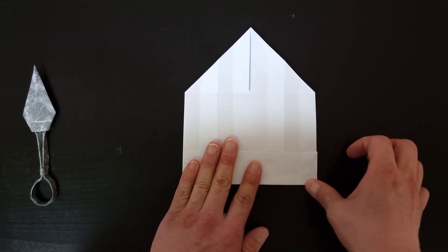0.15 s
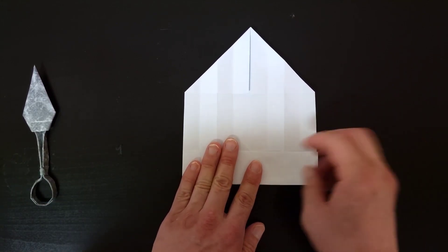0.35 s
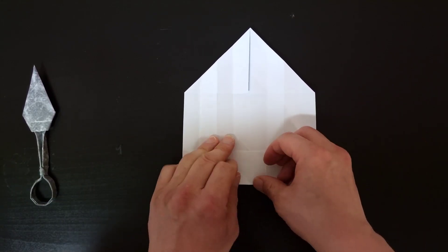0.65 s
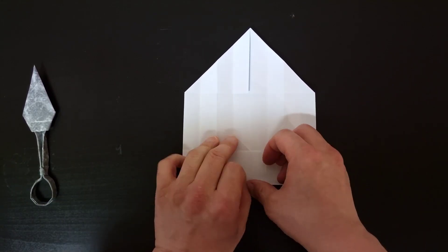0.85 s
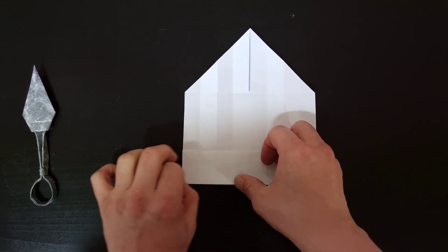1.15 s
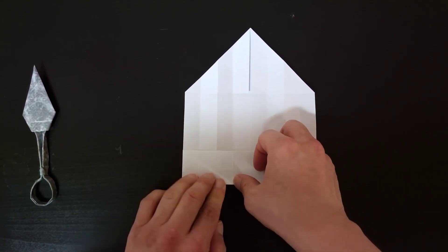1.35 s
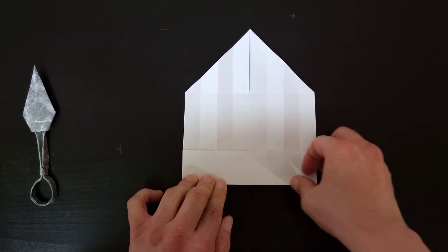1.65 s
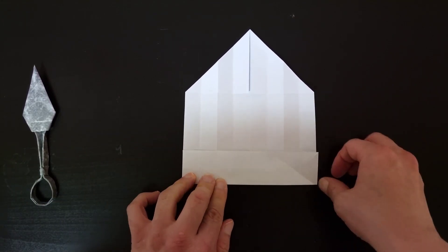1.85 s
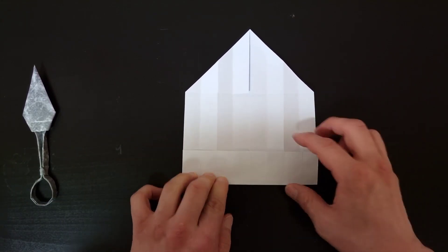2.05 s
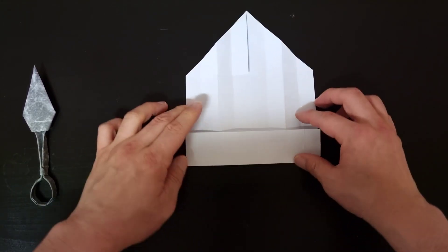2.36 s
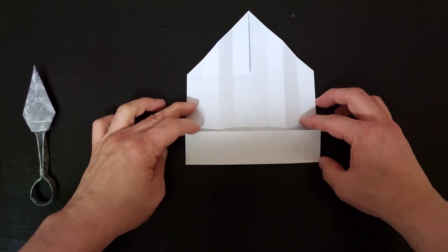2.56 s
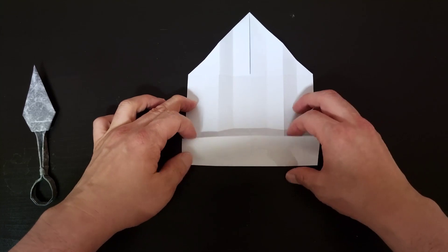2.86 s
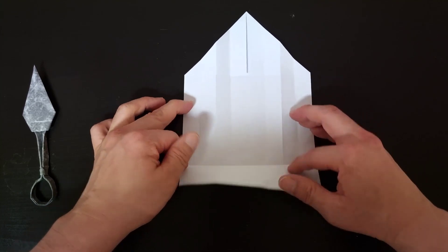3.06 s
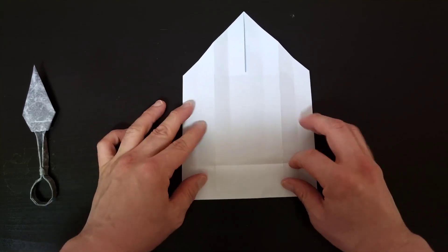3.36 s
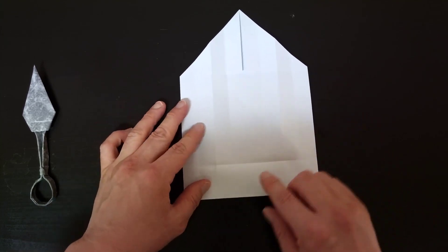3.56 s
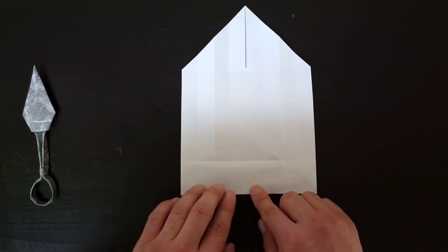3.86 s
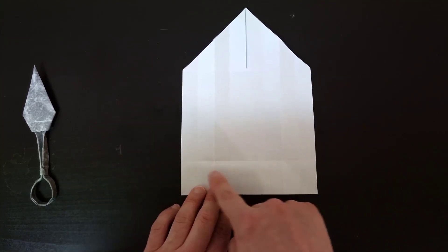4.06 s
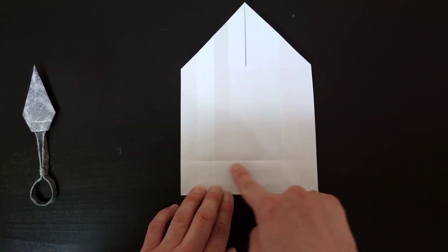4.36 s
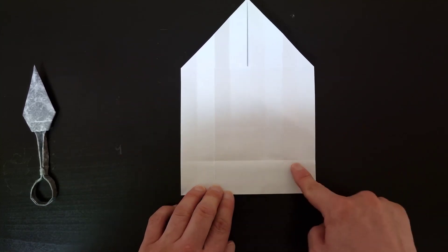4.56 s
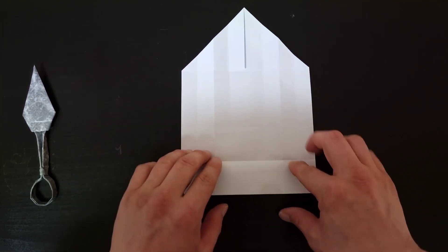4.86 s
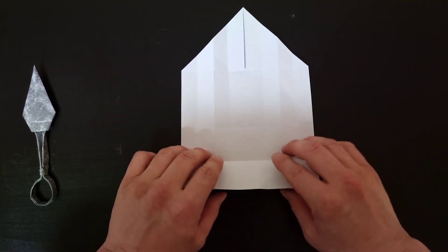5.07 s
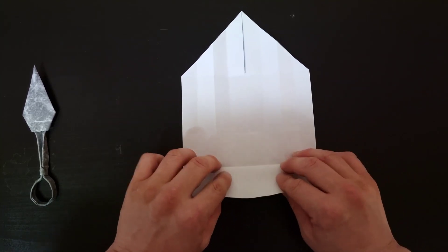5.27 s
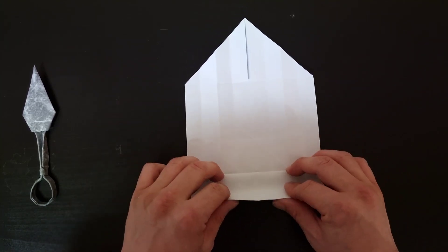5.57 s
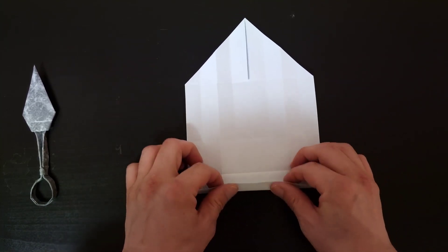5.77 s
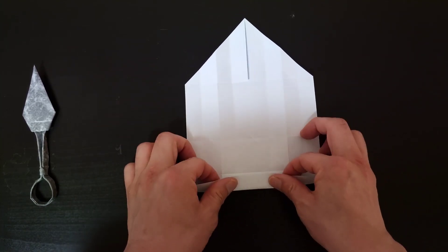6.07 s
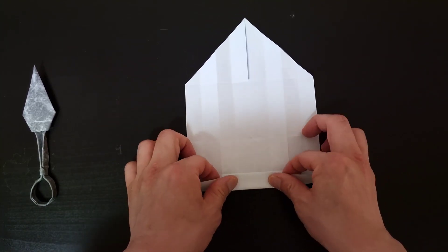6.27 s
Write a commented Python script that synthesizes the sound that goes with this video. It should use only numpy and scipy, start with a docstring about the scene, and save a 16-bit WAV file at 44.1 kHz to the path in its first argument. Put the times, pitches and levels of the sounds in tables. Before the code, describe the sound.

Close by, hands stroke, slide and fold a sheet of paper on a wooden table, with hissing rubs, rustles, crackles and soft finger knocks.

```python
"""Folding paper on a table

A sheet of printer paper is folded by hand on a wooden table, heard from close by in a small quiet room.
Skin and sheet hiss and rustle as streams of stick-slip grains, coarser for the sheet than for the skin.
Dragging judders the table. Buckling paper crackles and pops as short bursts of slips and noise.
Fingers landing excite decaying table modes, a pressing hand gives a deep thump, and a faint room tone lies below."""
import sys
import numpy as np
from scipy import signal
from scipy.fft import rfft, irfft, next_fast_len
from scipy.io import wavfile

SR = 44100
rng = np.random.default_rng(int(sys.argv[2]) if len(sys.argv) > 2 else 0)


def wav_out(sig):
    """Save sig, one row per channel (or a flat mono array), as 16-bit PCM at SR to the path in sys.argv[1]."""
    wavfile.write(sys.argv[1], SR, np.round(np.clip(np.atleast_2d(sig).T, -1, 1) * 32767).astype(np.int16))


N = 282681
TIME = np.arange(N) / SR
SIZE = next_fast_len(N + SR // 2)
FREQS = np.maximum(np.arange(SIZE // 2 + 1) * SR / SIZE, 1)
CUTOFF_HZ = 15900
# loudness grows as speed to these powers
HISS_POWER, RUSTLE_POWER, RUB_POWER = 3.34, 2.42, 2.14

# Finger drawn over the paper. Each row: top speed at [s], speeding up [s], slowing down [s],
# skin hiss [relative dB], sheen over the hiss [dB], rub on the table [relative dB].
FINGER_STROKES = [(0.131, 0.18, 0.32, -65.5, 2, -59), (0.609, 0.14, 0.24, -67, -3, -60),
                  (0.861, 0.021, 0.14, -71, 4, -71.5), (1.16, 0.32, 0.21, -66.5, 4, -58),
                  (1.42, 0.012, 0.016, -55.5, 7.5, -53), (1.632, 0.28, 0.27, -65.5, 3.5, -58),
                  (1.82, 0.23, 0.34, -74.5, -3, -57.5), (1.983, 0.05, 0.034, -76, -31, -50),
                  (4.43, 0.13, 0.14, -67.5, 2.5, -67), (4.571, 0.2, 0.16, -68, 12, -72),
                  (4.862, 0.12, 0.082, -67, -3, -96), (5.105, 0.085, 0.07, -106, -6, -57.5),
                  (5.206, 0.14, 0.054, -110, -11, -54.5), (6.0, 0.44, 0.22, -83, -12, -63.5)]
# Sheet slides, lifts or rolls over. Each row: top speed at [s], speeding up [s], slowing down [s],
# rustle [relative dB], nominal pitch of the bent flap at top speed [Hz], rub on the table [relative dB].
SHEET_MOVES = [(0.001, 0.03, 0.077, -58, 4150, -77), (1.25, 0.054, 0.028, -66, 4300, -49.5),
               (2.229, 0.034, 0.2, -62.5, 3170, -55), (2.359, 0.062, 0.16, -50, 3684, -51),
               (2.659, 0.11, 0.15, -75.5, 3630, -58.5), (2.913, 0.041, 0.1, -57.5, 3530, -48.5),
               (3.062, 0.13, 0.078, -52.5, 3210, -54.5), (3.129, 0.048, 0.35, -72, 4220, -60),
               (3.339, 0.11, 0.13, -60, 4620, -68), (3.55, 0.076, 0.11, -61, 4180, -62.5),
               (3.776, 0.081, 0.037, -62.5, 4350, -70), (4.892, 0.16, 0.21, -76, 3220, -74),
               (5.37, 0.19, 0.27, -65.5, 3936, -58.5), (5.541, 0.22, 0.13, -58.5, 4250, -51.5),
               (5.691, 0.098, 0.12, -59, 4380, -64), (5.799, 0.076, 0.11, -60.5, 2767, -61.5),
               (5.939, 0.046, 0.065, -59.5, 2840, -55.5)]
# Spectra of moving sheet and of skin on paper. Each row: frequency [Hz], relative density [dB per Hz].
RUSTLE_SPECTRUM = [(600, -21), (1900, -9), (3200, -2.5), (4000, 7), (4800, -2.5), (5800, -2.5), (7500, -8),
                   (11000, -16)]
HISS_SPECTRUM = [(2500, -4.5), (5500, 5.5), (7000, 9), (10000, 1.5), (13000, -4), (16000, -1.5)]


def sliding(hiss_gain_db=3.0, catch_db=2.5, sheet_sheen_db=-7, sheen_hz=11000,
            stroke_rustle_db=-15, sheet_hiss_db=-8.5):
    """The moving sheet rustles in coarse grains; skin on its fibres gives a much finer hiss."""
    sheet = movements([(*timing, db) for *timing, db, _, _ in SHEET_MOVES], RUSTLE_POWER)
    skin = movements([(*timing, db) for *timing, db, _, _ in FINGER_STROKES], HISS_POWER)
    racing = movements([(*timing, db + sheen_db) for *timing, db, sheen_db, _ in FINGER_STROKES], HISS_POWER)

    rustle = widen(*[colour(slips(N, per_s=4200, spread_db=5), RUSTLE_SPECTRUM) for _ in range(2)])
    hiss = widen(*[colour(slips(N, per_s=17000, spread_db=-0.5), HISS_SPECTRUM) for _ in range(2)])

    # a fingertip racing over a sheet that lies still gives the brightest hiss
    sheen_gain = np.hypot(racing, from_db(sheet_hiss_db + sheet_sheen_db) * sheet)
    sheen = band(hiss, sheen_hz, CUTOFF_HZ) * sheen_gain
    hiss_gain = np.hypot(skin, from_db(sheet_hiss_db) * sheet)   # a moving sheet also hisses
    hiss = under_hands(hiss, depth=1.0) * hiss_gain + sheen

    rustle = under_hands(rustle, depth=0.3)
    stirred = from_db(stroke_rustle_db) * skin * rustle   # a stroke also stirs the sheet
    rustle = flaps(rustle) + stirred
    catching_db = catch_db * drift(50)
    return rustle * from_db(catching_db) + hiss * from_db(hiss_gain_db + .5 * catching_db)


def flaps(rustle, rise_octaves_per_s=0.8, wander_octaves=0.04, unshifted_hz=4000):
    """Each movement bends a flap whose unevenly climbing pitch shifts the whole colour of the rustle."""
    out = np.zeros((2, N))
    wander = wander_octaves * drift(20)
    for s, rise_s, fall_s, db, hz, _ in SHEET_MOVES:
        gain = gesture(s, rise_s, fall_s, RUSTLE_POWER)
        moving = gain > 0
        pitch_hz = hz * 2 ** (rise_octaves_per_s * (TIME[moving] - s) + wander[moving])
        # replay the rustle at a varying speed
        read_at = s * SR / 2 + np.cumsum(pitch_hz / unshifted_hz)
        grains = np.array([np.interp(read_at, np.arange(N), side) for side in rustle])
        out[:, moving] += from_db(db) * gain[moving] * rms_one(grains)
    return out


def rubbing(rows, spectrum, ring_db, judder_db, resting_db=-79):
    """Skin or paper judders along and shakes the table beneath it."""
    ring = table_ring([m for m in TABLE_MODES if m[0] > 200], SR // 3)
    sides = []
    for _ in range(2):
        drag = colour(slips(N, per_s=550, spread_db=1.5), spectrum)
        ringing = signal.fftconvolve(drag, ring)[:N]
        sides.append(rms_one(drag) + from_db(ring_db) * rms_one(ringing))
    pressed = movements([(s, rise, fall, rub) for s, rise, fall, *_, rub in rows], RUB_POWER)
    pressed = np.hypot(pressed, from_db(resting_db))   # hands holding the sheet are never quite still
    return under_hands(widen(*sides), depth=0.61) * pressed * from_db(judder_db * drift(60))


# Spectrum of crackling paper. Each row: frequency [Hz], relative density [dB per Hz].
CRACKLE_SPECTRUM = [(300, 16.5), (1200, -6.5), (2500, 8), (4500, 9), (7000, 1), (15000, -9.5)]
# Sheet buckles or its edge scuffs. Each row: start [s], level [relative dB],
# pitch of the bent patch [Hz], length [s].
CRACKLES = [(0.541, -46.5, 4600, 0.0087), (1.413, -55.5, 3860, 0.017), (2.229, -48.5, 3270, 0.013),
            (2.574, -68.5, 3600, 0.039), (2.886, -47.5, 3200, 0.011), (3.058, -44.5, 2350, 0.022),
            (3.274, -53.5, 4200, 0.0025), (3.286, -45.5, 3780, 0.0034), (3.385, -52.5, 3720, 0.0053),
            (3.454, -59, 3260, 0.022), (3.759, -49.5, 4180, 0.019), (3.993, -53, 3900, 0.0068),
            (4.062, -64, 4600, 0.02), (4.927, -45, 3800, 0.0037), (4.939, -41, 3460, 0.00086),
            (4.942, -42.5, 3230, 0.002), (5.608, -54.5, 4140, 0.0023)]


def crackles(gain_db=-2, patch_db=-3, snap_db=-3, fade_db=15, lead_db=-13, lead_s=0.012):
    """A patch of paper creaks as it is loaded, then gives way with a snap and a run of smaller slips."""
    out, onset = np.zeros(N), SR // 25
    t = np.arange(-onset, SR // 4) / SR
    for s, db, hz, length_s in CRACKLES:
        creak = from_db(lead_db) * np.exp(-np.abs(t) / min(lead_s, length_s))
        release = from_db(-fade_db * (t / length_s / 1.64) ** 2)
        run = slips(len(t), per_s=1900, spread_db=1.5) * np.where(t < 0, creak, release)
        run[onset] += from_db(snap_db) * np.linalg.norm(run[onset:onset + SR // 200])
        # a snap barely rings; a long scuff locks on to the patch and nearly squeaks
        resonance = signal.iirpeak(hz, 2.2 + (length_s / 0.011) ** 2, fs=SR)
        patch = signal.lfilter(*resonance, band(run, hz / 2, hz * 2))
        burst = rms_one(colour(run, CRACKLE_SPECTRUM)) + from_db(patch_db) * rms_one(patch)
        loudest = np.std(burst[onset:onset + int((length_s + .002) * SR)])
        add(out, s - onset / SR, from_db(db + gain_db) * burst / loudest)
    return out


# Dimple in the sheet pops through. Each row: start [s], level [relative dB].
POPS = [(1.422, -51), (3.068, -44.5), (3.557, -53), (4.444, -46.5), (4.455, -54), (4.588, -63.5),
        (4.599, -63)]


def pops(low_hz=450, high_hz=3600, t60_s=0.044, snap_db=-5):
    """A dimple flips in one hard, hollow snap and the sheet shivers briefly after it."""
    out, t = np.zeros(N), np.arange(SR // 10) / SR
    lowpass = signal.cheby1(4, 3, high_hz, fs=SR, output="sos")
    for s, db in POPS:
        pop = rng.standard_normal(len(t)) * from_db(-60 * t / t60_s)
        pop[0] += from_db(snap_db) * np.linalg.norm(pop)
        pop = signal.sosfilt(lowpass, band(pop, low_hz, CUTOFF_HZ))
        add(out, s, from_db(db) * pop / np.std(pop[:SR // 200]))
    return out


# Fingers landing on the table. Each row: start [s], then thud, knock and nail clack [relative dB].
TAPS = [(0.542, -47.5, -48, -56.5), (0.854, -47.5, -52, -74), (1.242, -51, -55, -61.5),
        (1.426, -33, -48.5, -60), (1.493, -42, -45.5, -52), (1.894, -69, -52.5, -58),
        (1.909, -46, -43, -45.5), (1.96, -47.5, -43.5, -52), (1.978, -62, -46.5, -54),
        (2.241, -66, -31.5, -48), (2.261, -39.5, -46, -76), (2.644, -62, -47.5, -72),
        (2.89, -36.5, -33, -55), (2.912, -47, -41, -65), (3.068, -60, -41, -42.5), (3.222, -56, -53.5, -72),
        (3.392, -62, -57, -69), (4.117, -51.5, -71.5, -82), (4.93, -51, -65, -58), (5.294, -74, -53, -62),
        (5.466, -61, -52, -61), (5.586, -63, -52, -59.5), (6.008, -59, -54.5, -63.5),
        (6.082, -59, -59, -69.5)]


def taps(dead_t60_s=0.15, contact_db=-1):
    """The flesh of a finger moves the low modes, the bone the middle ones, the nail the high ones."""
    out, t, attack = np.zeros(N), np.arange(SR // 2) / SR, SR // 50
    # low Hz, high Hz, dead knock against the ring dB
    parts = ((60, 234, -15), (281, 420, -2.5), (590, 1710, -3.5))
    for s, *levels in TAPS:
        for (low_hz, high_hz, dead_db), level_db in zip(parts, levels):
            ring = table_ring([m for m in TABLE_MODES if low_hz < m[0] < high_hz], len(t))
            # one contact pulse; the many damped modes after it merge into a short dead knock
            dead = rng.standard_normal(len(t)) * from_db(-60 * t / dead_t60_s)
            dead[0] += from_db(contact_db) * np.linalg.norm(dead)
            dead = band(dead, low_hz, high_hz)
            blow = ring / np.std(ring[:attack]) + from_db(dead_db) * dead / np.std(dead[:attack])
            blow = band(blow, low_hz * np.sqrt(.5), high_hz * 1.83)   # a soft contact has no sharp edge
            add(out, s, from_db(level_db) * blow / np.std(blow[:attack]))
    return out


# Modes of the table top. Each row: nominal frequency [Hz], nominal level [relative dB], decay t60 [s].
TABLE_MODES = [(98.8, 11, 0.3), (143.1, 5.5, 0.25), (300.6, 8, 0.22), (348.2, 11.5, 0.11),
               (377.7, -1, 0.24), (456, 0, 0.42), (655, -4, 0.16), (790, -8, 0.12), (936, -6.5, 0.22),
               (1280, 4.5, 0.022)]


def table_ring(modes, size):
    """Modes answer one blow together; the spot and the resting hands shift level and pitch a little."""
    t = np.arange(size) / SR
    ring = np.zeros(size)
    for hz, db, t60_s in modes:
        decay = from_db(db + rng.normal(0, 2.2) - 60 * t / t60_s)
        ring += decay * np.sin(2 * np.pi * hz * t * rng.normal(1, .012))
    return ring


# Flat of the hand presses the sheet down. Each row: start [s], level [relative dB].
PRESSES = [(2.24, -33), (2.347, -40.5), (3.787, -43), (4.004, -45)]


def presses(hz=78, t60_s=0.096, attack_s=0.002):
    """A broad, soft push gives one deep, decaying tone with a softened start."""
    out, t = np.zeros(N), np.arange(SR // 2) / SR
    thump = np.sin(2 * np.pi * hz * t) * from_db(-60 * t / t60_s) * (1 - np.exp(-t / attack_s))
    thump = band(thump, hz, hz * 2)
    for s, db in PRESSES:
        add(out, s, from_db(db) * thump / np.std(thump[:SR // 50]))
    return out


# Spectrum of the quiet room. Each row: frequency [Hz], relative density [dB per Hz].
ROOM_TONE_SPECTRUM = [(15, -42.5), (25, -9.5), (66, 4.5), (140, 3), (560, -20.5), (1490, -29), (15500, -46)]


def room_tone(level_db=-62.5):
    """Low rumble of the room and a faint even hiss, as steady coloured noise."""
    return from_db(level_db) * widen(*[colour(rng.standard_normal(N), ROOM_TONE_SPECTRUM) for _ in range(2)])


def gesture(s, rise_s, fall_s, power):
    """A movement speeds up from rest and slows to rest again; its loudness follows a power of the speed."""
    gain = np.zeros(N)
    moving = (TIME > s - rise_s) & (TIME < s + fall_s)
    ramp = np.interp(TIME[moving], [s - rise_s, s, s + fall_s], [0, 1, 0])
    gain[moving] = np.sin(np.pi / 2 * ramp) ** power
    return gain


def movements(rows, power):
    """Joint gain of movements (top speed s, speeding up s, slowing down s, dB); their energies add."""
    return np.sqrt(sum((from_db(db) * gesture(*timing, power)) ** 2 for *timing, db in rows))


def slips(size, per_s, spread_db):
    """Stick-slip: tiny releases at random moments, with random strength and sign."""
    strength = from_db(spread_db * np.minimum(rng.exponential(1, size), 4)) * rng.choice([-1, 1], size)
    return rms_one(strength * (rng.random(size) < per_s / SR))


def drift(rate_hz):
    """Smooth chance of unit power, from random knots joined by straight lines."""
    knots = rng.standard_normal(N // 40)
    return rms_one(np.interp(TIME * rate_hz, np.arange(len(knots)), knots))


def under_hands(x, depth, sway=0.236, sway_hz=4, count=3):
    """Sound bounces between the sheet and the moving hands; the changing paths shift its colour."""
    out, at = x.copy(), np.arange(N)
    for k in range(count):
        delay = .00045 * (k + 1) ** 2 * SR * np.exp(sway * drift(sway_hz) / (k + 1))   # samples
        bounce = np.array([np.interp(at - delay, at, side) for side in x])
        out += (-1) ** k * depth * bounce
    return rms_one(out)


# Stereo likeness of a broad source. Each row: frequency [Hz], left-right correlation.
STEREO_LIKENESS = [(100, 0.94), (500, 0.34), (6000, 0.015)]


def widen(mid, side):
    """A broad source reaches the two microphones alike in the bass and unalike in the treble."""
    alike = np.clip(at_hz(STEREO_LIKENESS, FREQS), -1, 1)
    both = np.sqrt(1 + alike) * rfft(mid, SIZE) + np.sqrt(1 - alike) * rfft(side, SIZE) * [[1], [-1]]
    return rms_one(irfft(both, SIZE)[:, :N])


def echoes(x, t60_s, low_hz, high_hz):
    """Dense reflections of unit energy and even colour, different at each microphone."""
    t = np.arange(SR // 2) / SR
    decay = from_db(-60 * t / t60_s) * (t > .0005)
    response = rng.standard_normal((2, len(t))) * decay
    for _ in range(4):   # flatten the spectrum, then restore some decay
        flat = irfft(np.exp(1j * np.angle(rfft(response))), len(t))
        response = flat * np.sqrt(np.sqrt(decay))
    response = band(response, low_hz, high_hz)
    response /= np.linalg.norm(response, axis=1, keepdims=True)
    return signal.fftconvolve(x * np.ones((2, 1)), response, axes=1)[:, :N]


def from_db(db):
    """Decibels to gain."""
    return 10 ** (np.asarray(db) / 20)


def rms_one(x):
    """Scale to unit power."""
    return x / np.sqrt(np.mean(x ** 2) + 1e-20)


def at_hz(points, hz):
    """Read a table on a log-frequency axis."""
    table_hz, values = np.array(points).T
    return np.interp(np.log(hz), np.log(table_hz), values)


def colour(x, spectrum):
    """Causal (minimum-phase) filter with the given spectrum, by folding its cepstrum."""
    size = 2048
    hz = np.maximum(np.arange(size // 2 + 1) * SR / size, 1)
    cepstrum = irfft(np.log(from_db(at_hz(spectrum, hz))))
    cepstrum[1:size // 2] *= 2
    cepstrum[size // 2 + 1:] = 0
    return signal.fftconvolve(x, irfft(np.exp(rfft(cepstrum))))[:len(x)]


def band(x, low_hz, high_hz):
    """Gentle band-pass."""
    return signal.sosfilt(signal.butter(2, [low_hz, high_hz], "band", fs=SR, output="sos"), x)


def add(track, s, sound):
    """Mix a sound in at time s."""
    at = round(s * SR)
    track[at:at + len(sound)] += sound[:N - at]


# Drag of fingers and of the sheet on the table. Each row: frequency [Hz], relative density [dB per Hz].
FINGER_RUB_SPECTRUM = [(200, -17), (300, 2.5), (470, 7), (600, -0.5), (1000, 1.5), (1450, -5),
                       (2100, -17.5), (3500, -34.5)]
SHEET_RUB_SPECTRUM = [(210, -14), (295, 2), (430, 4), (600, -4), (1300, -9), (3000, -40)]


def scene(scatter_db=-5, desk_t60_s=.022, room_db=-6, room_t60_s=0.16):
    """Sharp sounds scatter off the desk; table and paper lie slightly to the right, in a dry room."""
    knocks, snaps = [x + from_db(scatter_db) * echoes(x, desk_t60_s, 870, CUTOFF_HZ)
                     for x in (taps(), crackles() + pops())]
    finger_rubs = rubbing(FINGER_STROKES, FINGER_RUB_SPECTRUM, ring_db=-8.5, judder_db=2.5)
    sheet_rubs = rubbing(SHEET_MOVES, SHEET_RUB_SPECTRUM, ring_db=-7, judder_db=2.0)
    # left and right gains in dB
    table = (knocks + presses() + finger_rubs + sheet_rubs) * from_db([[-.9], [.9]])
    paper = (snaps + sliding()) * from_db([[-.3], [.3]])
    near = table + paper
    return near + from_db(room_db) * echoes(near, room_t60_s, 390, CUTOFF_HZ) + room_tone()


def record(dry):
    """The top is cut steeply."""
    return signal.sosfilt(signal.ellip(10, .1, 70, CUTOFF_HZ, fs=SR, output="sos"), dry)


dry = scene()
out = record(dry)
wav_out(out)
```